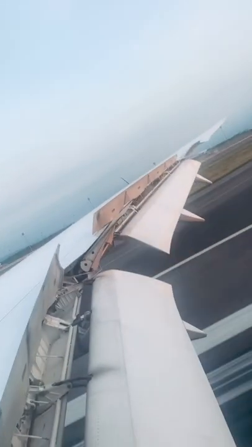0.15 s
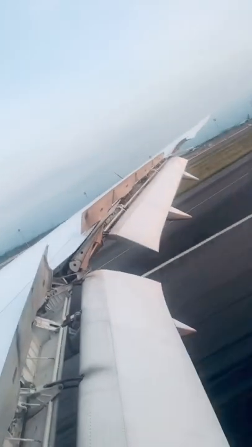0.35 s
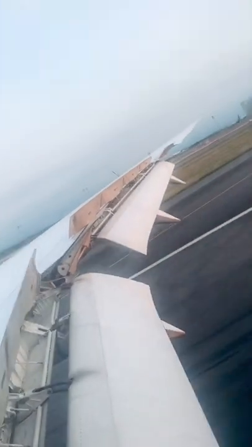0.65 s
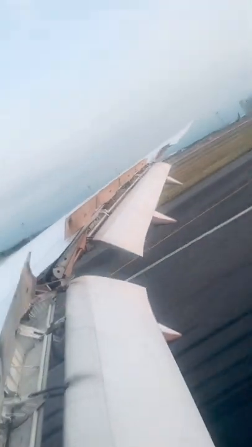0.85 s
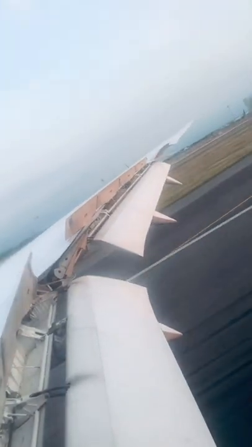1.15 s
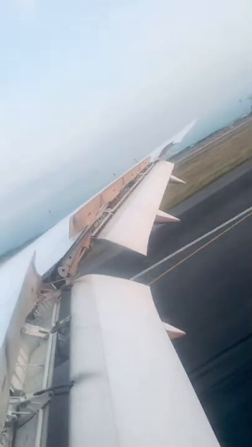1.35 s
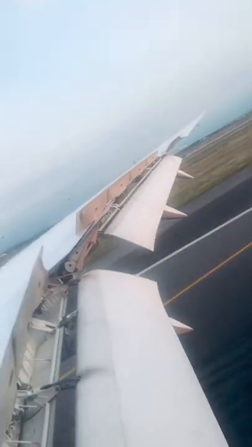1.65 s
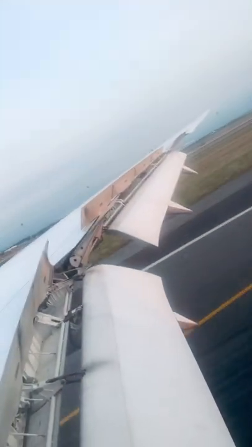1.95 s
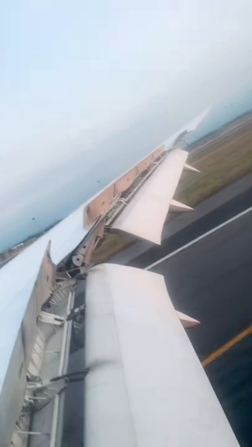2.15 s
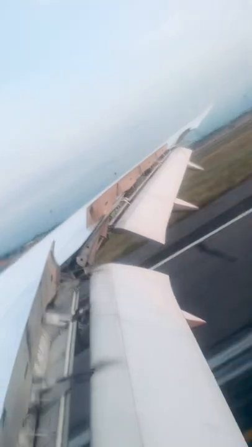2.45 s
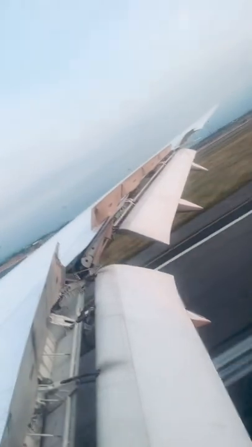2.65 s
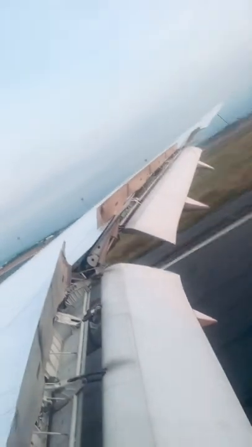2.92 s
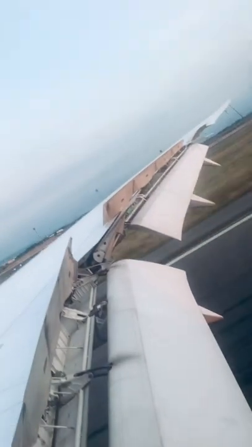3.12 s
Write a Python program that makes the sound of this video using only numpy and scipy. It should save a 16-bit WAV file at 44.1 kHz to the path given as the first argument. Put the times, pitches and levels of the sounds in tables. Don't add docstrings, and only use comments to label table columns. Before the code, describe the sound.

Jet cabin roar and low rumble during the runway roll, with bumps, rattles and a lid thud

```python
import sys
import numpy as np
from scipy import signal
from scipy.fft import rfft, irfft, next_fast_len
from scipy.io import wavfile
from scipy.ndimage import uniform_filter1d, minimum_filter1d, map_coordinates

SR = 44100
rng = np.random.default_rng(int(sys.argv[2]) if len(sys.argv) > 2 else 0)


def master_out(mix):
    frames = np.transpose(np.atleast_2d(mix))
    ceiling = np.clip(frames, -1, 1)
    pcm = np.round(ceiling * 32767).astype(np.int16)
    wavfile.write(sys.argv[1], SR, pcm)


def amplitude_ratio(level_db):
    exponent = np.asarray(level_db, float) / 20
    return 10 ** exponent


N = 144648


def unit(x):
    return x / np.sqrt(np.mean(x ** 2) + 1e-20)


def along(points, hz):
    f, v = np.transpose(points)
    return np.interp(np.log(hz + 1), np.log(f + 1), v)


def curve(rows):
    s, v = np.transpose(rows)
    return np.interp(np.arange(N) / SR, s, v)


def wobble(rate):
    knots = rng.standard_normal(int(N * 80 / SR) + 4)
    return map_coordinates(knots, [np.arange(N) * min(rate, 79) / SR])


def filtered(x, response):
    m = next_fast_len(N + SR // 2)
    return irfft(rfft(x, m) * response(np.fft.rfftfreq(m, 1 / SR)), m)[..., :N]


def patchy(patchy_db):
    z = signal.stft(rng.standard_normal((2, N)), nperseg=512)[2]
    field = uniform_filter1d(rng.standard_normal(z.shape[1:]), size=6, axis=0)
    field = uniform_filter1d(field, size=12, axis=1)
    return signal.istft(z * amplitude_ratio(patchy_db * unit(field)), nperseg=512)[1][:, :N]


# (frequency [Hz], density [dB per Hz])
VENT_COLOUR = [(800, -27), (1100, -2.5), (1700, 6), (2100, -5), (2500, -22.5), (3500, -11.5), (4300, -12.5),
               (5200, -30)]


def vent():
    level_db = -43.5 + 1.2 * wobble(5.4)
    hiss = filtered(patchy(patchy_db=3.0), lambda hz: amplitude_ratio(along(VENT_COLOUR, hz)) * (hz < 6000))
    return amplitude_ratio(level_db) * unit(hiss)


# (time [s], peak level [dB], swell length [s])
PANEL_SWELLS = [
    (.37, -30, 0.11),
    (.64, -29, 0.034),
    (1.34, -34, .1),
    (1.92, -27.5, 0.021),
    (2.8, -37.5, .1),
    (3.05, -39, .1),
]


def drone():
    panel_hz = 513.5
    t = np.arange(N) / SR
    swell = sum(amplitude_ratio(db) * np.exp(-((t - s) / length) ** 2) for s, db, length in PANEL_SWELLS)
    tone = np.sin(2 * np.pi * panel_hz * t + 0.46 * wobble(9))
    return np.sqrt(2) * swell * tone * amplitude_ratio([[-2.5], [1.5]])


SILENT_S = .64
PORT_LEAD = np.array([[1.5], [0]])

# (left port level [dB], right port level [dB])
PUMP_LEVELS = [(-30.5, -31.5), (-31.5, -38.5)]


def pumps():
    pump_hz, beat_hz = 853.15, 1.425
    t = np.arange(N) / SR - SILENT_S
    unsteady_db, waver = 1.6 * wobble(11), .45 * wobble(14)
    out = np.zeros((2, N))
    for k, db in enumerate(PUMP_LEVELS):
        phase = 2 * np.pi * (pump_hz + k * beat_hz) * t + PORT_LEAD + waver
        out += amplitude_ratio(np.array(db)[:, None] + unsteady_db) * (-1) ** k * np.sin(phase)
    return out


# (time [s], pitch [Hz])
SHAFT_PITCH = [(0, 1051), (1.5, 1058), (3.28, 1102)]
# (multiple of the shaft tone, level [dB])
WHINE_PARTIALS = [(1, -46), (8, -66)]


def turbine():
    fade_db_per_s = 1.5
    t = np.arange(N) / SR - SILENT_S
    turns = np.cumsum(curve(SHAFT_PITCH) + 2.5 * wobble(5.3)) / SR
    out = np.zeros((2, N))
    for k, db in WHINE_PARTIALS:
        level_db = db - fade_db_per_s * t + 1.7 * wobble(2.1)
        out += amplitude_ratio(level_db) * np.sin(2 * np.pi * k * turns + PORT_LEAD)
    return out


# (time [s], peak level [dB])
TICKS = [
    (1.0372, -25),
    (2.4302, -20),
    (3.0345, -21),
    (3.2405, -17.5),
]
# (frequency [Hz], level [dB])
TICK_COLOUR = [(400, -12), (1200, -3), (3500, -4), (6500, -6), (10000, -28), (12300, -10), (15000, -24),
               (15800, -60)]


def ticks():
    tick_db, burst_s, tail_db, tail_s = 19, .0015, -23, .03
    out, t = np.zeros((2, N + SR)), np.arange(SR // 5) / SR
    snap = (t == 0) * np.array([[1], [-.25]])
    shape = amplitude_ratio(-60 * t / burst_s) + amplitude_ratio(tail_db - 60 * t / tail_s)
    for s, db in TICKS:
        rattle = shape * rng.standard_normal((2, len(t))) / 4
        out[:, round(s * SR):][:, :len(t)] += amplitude_ratio(db + tick_db) * (rattle + snap)
    return filtered(out[:, :N], lambda hz: amplitude_ratio(along(TICK_COLOUR, hz)))


# (time [s], level [dB], pitch [Hz])
LID_BLOWS = [
    (.684, -7, 500),
    (.694, -6, 410),
]
# (multiple of pitch, level [dB], 60 dB decay [s])
LID_MODES = [(1, 0, .07), (1.75, -15, .04), (2.4, -16, .04)]


def bin_lid():
    rise_s = .003
    out, t = np.zeros(N + SR), np.arange(SR // 5) / SR
    for s, db, hz in LID_BLOWS:
        ring = sum(amplitude_ratio(level - 60 * t / t60) * np.sin(2 * np.pi * k * hz * t) for k, level, t60 in LID_MODES)
        out[round(s * SR):][:len(t)] += amplitude_ratio(db) * ring * (1 - np.exp(-t / rise_s))
    return out[:N] * np.array([[.8], [1]])


# (time [s], level [dB])
SHAKE = [(0.0, -43.5), (0.02, -51), (0.52, -53), (0.58, -42.5), (0.69, -36), (0.73, -40.5), (1.45, -54),
         (1.61, -48), (2.69, -47.5), (2.91, -45), (3.22, -46.5), (3.28, -42.5)]
# (frequency [Hz], density [dB per Hz])
TRIM_COLOUR = [(200, -15.5), (500, 6), (1200, 0), (2500, -14.5), (4000, -14), (7000, -25), (13000, -33.5),
               (15500, -41.5)]
# (time [s], peak level [dB], rattle length [s], treble over the rest [dB])
JOLTS = [(0.045, -29, 0.017, -13.5), (0.249, -31.5, 0.019, -10.5), (0.302, -42, 0.036, -0.5),
         (0.515, -31, 0.1, -14), (0.574, -25, 0.015, -7.5), (0.6004, -28, 0.033, -4),
         (0.641, -29, 0.013, -3), (0.654, -27.5, 0.02, -4.5), (0.677, -26, 0.02, -3),
         (0.703, -29.5, 0.02, -11), (0.843, -37, 0.022, -3.5), (0.924, -36.5, 0.015, -4.5),
         (0.947, -40.5, 0.043, -22.5), (0.958, -34, 0.014, -6.5), (1.165, -35.5, 0.034, -20),
         (1.208, -34, 0.012, -15), (1.223, -35, 0.016, -15), (1.482, -42.5, 0.023, -7),
         (1.512, -48, 0.015, -2), (1.548, -40, 0.017, -6.5), (1.599, -35, 0.073, -7.5),
         (1.713, -37, 0.018, -2), (1.821, -38.5, 0.03, -8.5), (1.922, -35.5, 0.053, -9.5),
         (1.939, -32.5, 0.019, -4.5), (1.984, -32, 0.038, -15), (2.055, -36, 0.025, -14),
         (2.257, -36.5, 0.017, -14), (2.32, -41, 0.012, -4.5), (2.348, -28.5, 0.012, -10.5),
         (2.372, -37.5, 0.03, 1), (2.403, -34, 0.071, -15), (2.746, -37, 0.11, -9),
         (2.8484, -29.5, 0.019, -6), (2.867, -36, 0.038, -1), (2.916, -33, 0.026, -8.5),
         (3.135, -31.5, 0.03, -9), (3.158, -37, 0.017, -8), (3.173, -38, 0.048, -18)]


def trim():
    trim_db, jolt_db, jolt_rise_s = 9.5, 8.5, 0.0026
    grains_per_s, grain_spread_db, grain_s, grain_share = 670, 7, 0.026, 0.23
    body_hz, body_db = 920, -9.5
    treble_hz, treble_db = 5300, 9
    t = np.arange(N) / SR

    when, luck = rng.random((int(grains_per_s * N / SR), 2)).T
    grain_db = np.minimum(-grain_spread_db * np.log(luck + 1e-4), 16)
    hits = np.bincount((when * N).astype(int), amplitude_ratio(grain_db), N)
    chatter = unit(signal.fftconvolve(hits, amplitude_ratio(-60 * t[:SR // 20] / grain_s))[:N])
    grain = (np.sqrt(1 - grain_share) + np.sqrt(grain_share) * chatter) * patchy(patchy_db=1.5)
    rattle = unit(filtered(grain, lambda hz: amplitude_ratio(along(TRIM_COLOUR, hz))))

    unsteady_db = np.array([3.64 * wobble(22.49), 1.6 * wobble(27), 2.7 * wobble(12)])
    power = amplitude_ratio(1.758 * (curve(SHAKE) + unsteady_db))
    for s, db, length, bright_db in JOLTS:
        u = np.clip(t - s, 0, None)
        burst = (1 - np.exp(-u / jolt_rise_s)) ** 2 * np.exp(-(u / length) ** 2)
        band_db = np.array([[0], [bright_db + treble_db], [body_db]])
        power = power + amplitude_ratio(2 * (db + jolt_db - trim_db + band_db)) * burst
    middle_gain, treble_gain, body_gain = np.sqrt(power)

    low = filtered(rattle, lambda hz: 1 / (1 + (hz / treble_hz) ** 2))
    body = filtered(rattle, lambda hz: 1 / (1 + (hz / body_hz) ** 4))
    return amplitude_ratio(trim_db) * (body_gain * body + middle_gain * (low - body) + treble_gain * (rattle - low))


# (time [s], boom level [dB])
THRUST = [
    (0.0, -10.5),
    (1.26, -8.5),
    (1.68, -8.5),
    (1.7, -10),
    (1.77, -9.5),
    (3.28, -6.5),
]
# (frequency [Hz], density [dB per Hz])
ROAR_COLOUR = [(215, -30.5), (300, 0.5), (520, -3.5), (640, -14), (1300, -13.5), (2200, -20), (5000, -54),
               (14000, -50.5)]


def roar():
    roar_db, grows = -28, 1.22
    thrust_db = curve(THRUST)
    swing_db = grows * (thrust_db - thrust_db.mean())
    level_db = roar_db + swing_db + 2.2 * wobble(3.05) + 1.07 * wobble(16)
    return amplitude_ratio(level_db) * unit(filtered(patchy(patchy_db=2.5), lambda hz: amplitude_ratio(along(ROAR_COLOUR, hz))))


# (frequency [Hz], level [dB])
HULL_MODES = [(33, -11.5), (45, -15.5), (61, 3.5), (76, 0), (92, 2), (122, -5.5), (160, -4), (198, -11),
              (290, -17.5)]


def hull():
    loss, skirt = .3, 3.2

    def modes(f):
        power = 0
        for c, db in HULL_MODES:
            damping = f * c * loss
            power = power + amplitude_ratio(2 * db) * abs(damping / (c * c - f * f + 1j * damping)) ** skirt
        return np.sqrt(power)

    flutter_db = 1.1 * wobble(18)
    return amplitude_ratio(curve(THRUST) + flutter_db) * unit(filtered(rng.standard_normal((2, N)), modes))


def cabin(x):
    ripple_db, ripple_hz = 2.2, 45
    knots = rng.standard_normal(int(SR / 2 / ripple_hz) + 4)

    def ripple(hz):
        above_bass = np.clip(hz / 1200, 0, 1) ** 2
        return amplitude_ratio(ripple_db * above_bass * map_coordinates(knots, [hz / ripple_hz]))

    return filtered(x, ripple)


# (frequency [Hz], left lead [radians])
PORT_PHASE = [(450, 0), (800, 2.5), (2150, 2.8), (5400, 3.14), (7200, 6.28), (9800, 9.42), (12250, 12.57),
              (14900, 15.7)]
# (frequency [Hz], coherence [0..1])
PORT_LIKENESS = [(100, .99), (300, .88), (600, .12), (2600, .72), (3500, .3), (5000, .84), (6000, .55),
                 (7200, .96)]
# (frequency [Hz], left over right [dB])
PORT_BALANCE = [(60, -.7), (130, -1), (280, -2.5), (430, -3.5), (750, 1.5), (1200, -1), (2500, 0)]


def ports(pair):
    dwell = .6
    half = np.array([[.5], [-.5]])

    def split(hz):
        turn = np.arccos(np.clip(along(PORT_LIKENESS, hz), 0, 1)) / 2
        return np.array([np.cos(turn), np.sin(turn)])

    def place(hz):
        phase = along(PORT_PHASE, hz)
        lead = phase - dwell / 2 * np.sin(2 * phase)
        return amplitude_ratio(half * along(PORT_BALANCE, hz)) * np.exp(1j * half * lead)

    same, other = filtered(pair, split)
    return filtered(np.array([same + other, same - other]), place)


def scene():
    diffuse = vent() + trim() + roar() + hull()
    return ports(cabin(diffuse)) + drone() + pumps() + turbine() + ticks() + bin_lid()


# (frequency [Hz], least level of the weaker one [dB])
MASKING = [(4200, -18), (5000, -8), (5800, -12), (7200, -11), (9800, -6), (12300, -5), (15000, -6)]


def thinned(x):
    hop, grid, band_lines = 1024, 968, 16
    from_hz, top_hz = 1500, 15800
    jitter_db, quiet_db, faint_db = 4.5, -65.5, -13
    sudden_db = 17
    k = np.arange(2 * hop)
    window = signal.windows.kaiser_bessel_derived(2 * hop, 4 * np.pi)[:, None]
    cosines = np.cos(np.pi / hop * np.outer(k + .5 + hop / 2, k[:hop] + .5))
    basis = window * np.sqrt(2 / hop) * cosines
    hz = (k[:hop] + .5) * SR / (2 * hop)

    front, frames = 2 * hop - grid, N // hop + 3
    mid_side = np.array([x[0] + x[1], x[0] - x[1]]) / 2
    padded = np.pad(mid_side, [(0, 0), (front, (frames + 1) * hop - front - N)])
    halves = padded.reshape(2, -1, hop)
    blocks = np.concatenate([halves[:, :-1], halves[:, 1:]], axis=2)
    z = blocks @ basis

    band = (z ** 2).reshape(2, frames, -1, band_lines).mean(axis=3)
    chance = rng.standard_normal(band.shape) + rng.standard_normal((frames, 1))
    limit_db = jitter_db * unit(uniform_filter1d(chance, size=3, axis=1))
    limit_db = limit_db.repeat(band_lines, axis=2)
    band = band.repeat(band_lines, axis=2)
    unmasked = band > amplitude_ratio(2 * (along(MASKING, hz) + limit_db)) * band[::-1]
    audible = band > amplitude_ratio(2 * quiet_db + limit_db)
    strong = z ** 2 > amplitude_ratio(2 * (faint_db + limit_db)) * band
    edge = np.diff(blocks, n=3, axis=2) ** 2
    sudden = (edge.max(axis=(0, 2)) > amplitude_ratio(2 * sudden_db) * edge.mean(axis=(0, 2)))[:, None]
    keep = (unmasked & audible & strong) | sudden | (hz < from_hz)

    back = (z * keep * (hz < top_hz)) @ basis.T
    joined = (back[:, 1:, :hop] + back[:, :-1, hop:]).reshape(2, -1)
    mid, side = joined[:, front - hop:][:, :N]
    return np.array([mid + side, mid - side])


def low_pass(x):
    return signal.sosfilt(signal.butter(12, 15800, fs=SR, output="sos"), x)


def record(dry):
    ceiling, knee, hold_s = 0.97, 5.9, 0.0055
    span = int(hold_s * SR)
    need = np.minimum(1, 1.12 * ceiling / (abs(dry).max(0) + 1e-9))
    limited = dry * uniform_filter1d(minimum_filter1d(need, size=span), size=span)
    clipped = limited / (1 + abs(limited / ceiling) ** knee) ** (1 / knee)
    mix = thinned(clipped)
    return low_pass(mix)


dry = scene()
out = record(dry)
master_out(out)
```